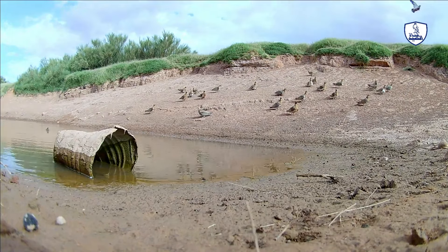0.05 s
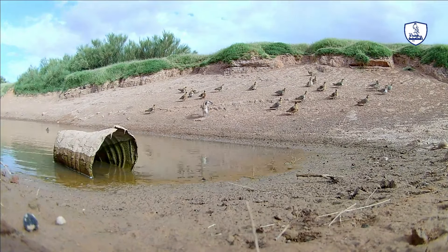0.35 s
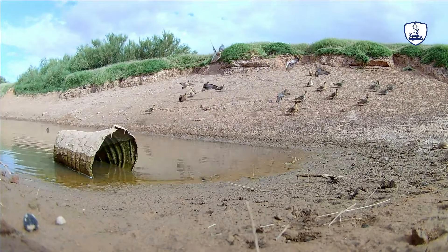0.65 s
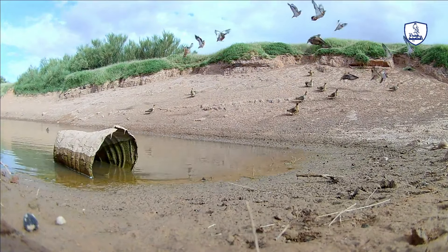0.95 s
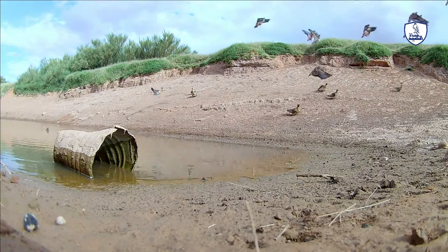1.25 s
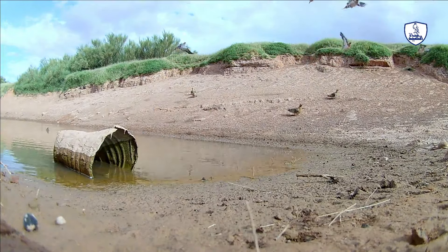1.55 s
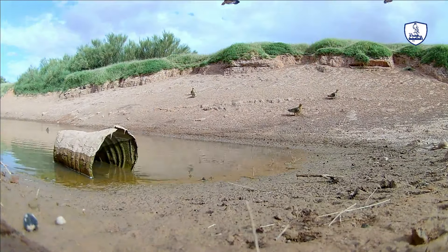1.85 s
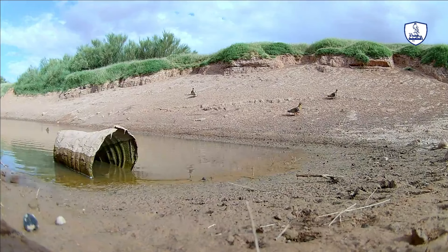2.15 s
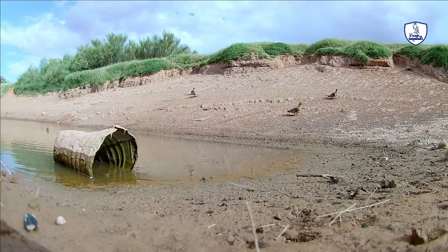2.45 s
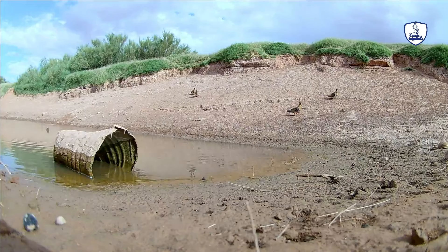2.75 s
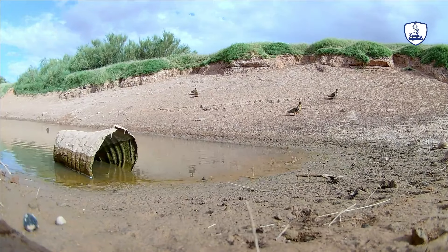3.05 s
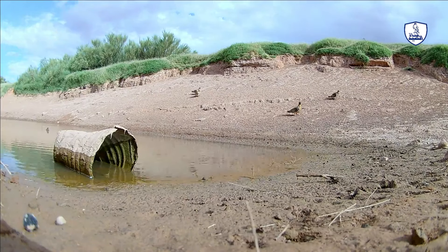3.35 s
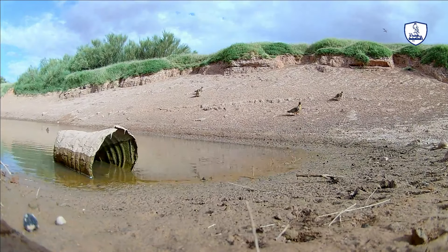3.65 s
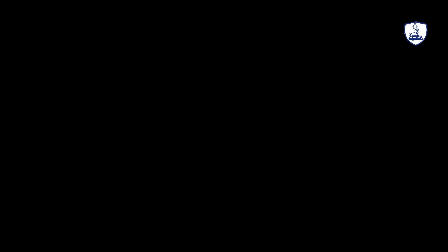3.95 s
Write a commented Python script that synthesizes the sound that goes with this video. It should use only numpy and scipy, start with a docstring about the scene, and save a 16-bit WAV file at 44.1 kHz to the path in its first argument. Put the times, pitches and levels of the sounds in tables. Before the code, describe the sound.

A flock of birds gives harsh clucks and nasal, quavering cries some way off, with a slight echo. From about 0.5 to 1.7 seconds the calls overlap thickly as the birds take off, wings fluttering and clicking. The flutter fades by 3 seconds while scattered calls continue. Wind rumbles on the microphone over faint hiss, strongest near 1.3 seconds. Everything cuts off at about 3.7 seconds.

```python
"""You hear harsh clucks and long nasal, quavering cries as a flock of sandgrouse takes off, some way off,
from the bank of a desert waterhole. Each call is a rasping tone shaped by the bird's throat and beak.
Wings flutter as they push puffs of air, and their tips click together. The bank adds a short echo.
Wind rumbles on the microphone over a faint hiss, and the sound cuts off shortly before the end."""
import sys
import numpy as np
from scipy import signal
from scipy.fft import rfft, irfft
from scipy.io import wavfile

SR = 44100
rng = np.random.default_rng(int(sys.argv[2]) if len(sys.argv) > 2 else 0)


def wav_record(signal):
    """Record a signal, one row per channel, as 16-bit PCM in the file named by sys.argv[1]."""
    frames = np.transpose(np.atleast_2d(signal))
    bounded = np.clip(frames, -1, 1)
    # unit amplitude maps onto the largest positive 16-bit level
    quanta = np.round(bounded * 32767).astype(np.int16)
    wavfile.write(sys.argv[1], SR, quanta)


N = 176400  # 4 seconds

# Short throaty clucks: start_s, length_s, first_hz, top_hz, last_hz, throat_db, nasal_db
CLUCKS = [ (.472, 0.091, 357, 446, 315, -32, -40), (.55, 0.088, 341.6, 421.3, 329.5, -35, -43),
          (.61, 0.079, 298.4, 432.3, 379, -35, -42), (.735, .068, 421, 539, 540, -27, -48),
          (.96, 0.11, 466.4, 606.5, 580, -36.5, -44.5), (1.14, 0.035, 442, 449.6, 402, -24.5, -41.5),
          (1.395, 0.089, 424, 499, 490.6, -30.5, -46.5), (1.465, 0.12, 514.6, 536, 341.5, -36.5, -55),
          (1.78, 0.06, 410, 408.5, 276, -36, -54), (1.865, 0.0485, 274, 412, 412.5, -36.5, -55),
          (2.845, 0.037, 250, 421, 422, -35, -65), (2.912, 0.063, 465, 463, 276.5, -34, -52.5),
          (3.018, 0.0433, 260, 424, 427, -36, -52), (3.06, 0.054, 402, 455, 281, -38, -43)]
# Long quavering cries: start_s, length_s, first_hz, top_hz, last_hz, throat_db, nasal_db
CRIES = [ (0, 0.14, 495, 518.4, 465, -42.5, -48.5), (.218, 0.11, 450, 501, 497, -46.5, -45.5),
         (1.595, 0.073, 601, 619, 543, -35, -34), (1.66, .22, 547.5, 545, 402.8, -40.5, -45),
         (1.69, 0.1, 439, 498.4, 495, -40.5, -40), (1.924, .11, 466, 499, 500.3, -40, -40.5),
         (1.988, .145, 421.6, 444.6, 365, -48, -45.5), (2.186, 0.31, 434.5, 453.5, 359, -47.5, -46),
         (2.25, 0.22, 603, 619, 471, -35, -44), (2.343, .21, 586.7, 591.2, 416, -45.5, -40),
         (2.525, 0.11, 415, 411, 325, -64.5, -50.5), (2.95, 0.13, 512, 559, 364, -49, -39.5),
         (3.108, .215, 570, 573, 427.5, -54.5, -42.5), (3.29, 0.13, 417.5, 418, 311, -67, -54.5),
         (3.67, 0.087, 632, 701, 748, -54, -50.5)]
# How each kind of call is sung; quaver is the pitch wobble as a share of the pitch
CLUCK_STYLE = dict(attack_s=0.013, release_s=0.0094, fade_db=-0.5, quaver=0.019, fall=1.6, rasp=0.26)
CRY_STYLE = dict(attack_s=0.0065, release_s=0.033, fade_db=-9.5, quaver=0.026, fall=1.7, rasp=0.18)
# The low, throaty resonance of the voice: frequency_hz, gain_db
THROAT_TONE = [(200, 4), (560, 0), (720, -13.5), (1050, -19.5), (2200, -57)]
# The higher, nasal resonance of the voice: frequency_hz, gain_db
NASAL_TONE = [(1050, -35.5), (1380, -3.5), (1740, -0.5), (2120, -9.5), (2550, -41), (5000, -49.5)]
# How loudly the rest of the flock calls: time_s, level_db
FLOCK_LEVELS = [(.55, -45.5), (.78, -38.5), (.88, -35), (1.2, -34.5), (1.45, -38), (1.72, -51.5)]
# How loud the wing flutter is: time_s, level_db
WING_LEVELS = [(0, -39), (.5, -40), (1.0, -31), (1.7, -32.5), (2.3, -38), (3.2, -52)]
# The soft, low tone of air pushed by wings: frequency_hz, gain_db
WING_TONE = [(50, 0.5), (130, 2), (330, 2), (700, -17), (2700, -36.5), (4300, -35.5), (9000, -69)]
# Wing tips meeting: start_s, gain_db
WING_CLAPS = [(0.7176, -45), (0.831, -39), (0.935, -41), (0.9615, -38), (1.1036, -41), (1.1973, -39),
              (1.4371, -36.5), (1.4822, -35.5), (1.5205, -35)]
# The bright tone of a wing-tip click: frequency_hz, gain_db
CLICK_TONE = [(2500, -12.5), (4300, 17), (6000, -5), (7200, 4), (9000, -6.5)]
# How the wind swells and sinks: time_s, level_db
WIND_LEVELS = [(0, -36), (.3, -29.5), (.55, -35), (.9, -30.5), (1.32, -25), (1.6, -30.5), (2.3, -35),
               (2.85, -40.5), (3.4, -46), (3.55, -41.5)]
# The deep tone of wind on the microphone: frequency_hz, gain_db
WIND_TONE = [(10, -7), (35, 3), (75, -0.5), (300, -22.5), (1500, -70.5)]
# The tone of the background hiss: frequency_hz, gain_db
HISS_TONE = [(200, 2), (900, -12), (3000, -24), (10000, -32.5), (15500, -28.5)]


def bird_call(length_s, first_hz, top_hz, last_hz, throat_db, nasal_db,
              attack_s, release_s, fade_db, quaver, fall, rasp):
    """A rasping tone and its overtones glide through the throat and nasal resonances."""
    quaver_hz, strain_above_hz, ring_hz = 32.02, 597, 2980
    t = np.arange(0, length_s, 1 / SR)
    progress, n = t / length_s, len(t)
    up, down = (abs(top_hz - first_hz) + 1) ** .6, (abs(top_hz - last_hz) + 1) ** .6
    top_at = up / (up + down)  # the wider glide takes the longer time
    hz = top_hz + (first_hz - top_hz) * np.maximum(1 - progress / top_at, 0) ** 1.572
    hz += (last_hz - top_hz) * np.maximum((progress - top_at) / (1 - top_at), 0) ** fall
    shake = np.sin(2 * np.pi * (quaver_hz * t + rng.random()) + wander(n, 21.2))
    hz *= 1 + quaver * shake + 0.01 * wander(n, 170)
    phase = 2 * np.pi * np.cumsum(hz) / SR
    # A call pushed to a high pitch rings a high overtone.
    strain = amp(throat_db - 26.5) / (1 + np.exp((strain_above_hz - top_hz) / 10))
    beak = 0.83 + 0.17 * np.minimum(progress / top_at, 1)  # the opening beak raises the nasal resonance
    voice = np.zeros(n)
    for k in range(1, 11):
        throat = amp(throat_db) * tone_gain(THROAT_TONE, k * hz)
        nasal = amp(nasal_db) * beak ** 2 * tone_gain(NASAL_TONE, k * hz / beak)
        ring = strain * np.exp(-(10 * np.log(k * hz / ring_hz)) ** 2 / 2)
        roughness = rasp * wander(n, 150) * np.cos(k * phase + 2 * np.pi * rng.random())
        voice += (throat + nasal + ring) * (np.cos(k * phase) + roughness)
    from_top = abs(progress - top_at)
    loudness = np.minimum(t / attack_s, 1) * np.minimum((length_s - t) / release_s, 1)
    loudness *= amp(fade_db * (from_top - from_top.mean()))  # quieter away from the top
    return np.sqrt(2) * voice * loudness * (1 + .2 * shake)  # the level shakes with the quaver


def leading_birds():
    """The clucks and cries that stand out from the flock."""
    out = np.zeros(N)
    for calls, style in ((CLUCKS, CLUCK_STYLE), (CRIES, CRY_STYLE)):
        for start_s, *call in calls:
            add(out, start_s, bird_call(*call, **style))
    return out


def flock(calls=42):
    """Many birds call over one another as they rise, each with its own glide and tone."""
    out = np.zeros(N)
    slots_s, gap_s = np.linspace(FLOCK_LEVELS[0][0], FLOCK_LEVELS[-1][0], calls, retstep=True)
    for slot_s in slots_s:
        start_s = slot_s + gap_s * rng.uniform(-0.46, .5)
        top_hz = rng.uniform(380, 560)
        first_hz, last_hz = top_hz * rng.uniform(0.65, 1, 2)
        throat_db = np.interp(start_s, *np.transpose(FLOCK_LEVELS))
        nasal_db = throat_db - 12 + 2 * rng.standard_normal()
        length_s = rng.uniform(0.0629, 0.15)
        add(out, start_s, bird_call(length_s, first_hz, top_hz, last_hz, throat_db, nasal_db, **CRY_STYLE))
    return out


def wing_flutter(birds=11, beats_per_s=12, stroke_s=0.024):
    """Each bird flaps at its own drifting rate; every downstroke pushes a puff of air."""
    power = np.zeros(N)
    for _ in range(birds):
        beats = np.cumsum(beats_per_s * (1 + 0.1099 * wander(N, 1))) / SR + rng.random()
        age = (beats % 1) / beats_per_s / stroke_s  # time since the flap began, in stroke lengths
        puffs = age * np.exp(-2 * age) * amp(6.75 * wander(N, 1.66))
        power += puffs ** 2
    air = np.sqrt(power) * rng.standard_normal(N)
    return normalise(shape_tone(air, WING_TONE)) * level_curve(WING_LEVELS)


def wing_claps(click_s=0.0022, thump_hz=235):
    """Wing tips meet: a dry click on a small thump of air."""
    out, t = np.zeros(N), np.arange(1024) / SR
    thump = np.sin(2 * np.pi * thump_hz * t) * np.exp(-t * thump_hz)
    for start_s, gain_db in WING_CLAPS:
        burst = rng.standard_normal(len(t)) * t * np.exp(-2 * t / click_s)
        click = shape_tone(burst, CLICK_TONE)
        add(out, start_s, amp(gain_db) * (amp(-7.5) * click / abs(click).max() + amp(14) * thump))
    return out


def bank_echo(sound, echo_db=-12.5, die_away_s=0.21):
    """The earth bank scatters back a short, weak echo, which is added to the sound."""
    t = np.arange(SR // 2) / SR
    tail = rng.standard_normal(len(t)) * amp(-60 * t / die_away_s) * np.minimum(t / 0.0031, 1)
    return sound + amp(echo_db) * signal.fftconvolve(sound, tail / np.linalg.norm(tail))[:N]


def wind(gust_db=1.5):
    """Wind buffets the microphone with a low, lumpy rumble."""
    gusts = rng.standard_normal(N) * amp(gust_db * wander(N, 18))
    return normalise(shape_tone(gusts, WIND_TONE)) * level_curve(WIND_LEVELS)


def hiss(level_db=-51):
    """The air and the microphone give a faint, steady hiss."""
    return amp(level_db) * normalise(shape_tone(rng.standard_normal(N), HISS_TONE))


def amp(db):
    """Turns decibels into a number to multiply by."""
    return 10 ** (np.asarray(db) / 20)


def normalise(sound):
    """Scales a sound so its average (rms) level is 1."""
    return sound / np.sqrt(np.mean(sound ** 2) + 1e-20)


def tone_gain(tone, hz):
    """Looks up a tone table's gain at these frequencies."""
    table_hz, db = np.transpose(tone)
    return amp(np.interp(np.log(hz + 1), np.log(table_hz), db))


def level_curve(levels):
    """Turns a level table into a gain for every sample."""
    return amp(np.interp(np.arange(N) / SR, *np.transpose(levels)))


def shape_tone(sound, tone):
    """Turns each frequency up or down as a tone table says."""
    hz = np.fft.rfftfreq(len(sound), 1 / SR)
    return irfft(rfft(sound) * tone_gain(tone, hz), len(sound))


def wander(samples, rate_hz):
    """A smooth random wobble, mostly slower than rate_hz."""
    span = max(samples, 16384)
    hz = np.fft.rfftfreq(span, 1 / SR)
    spectrum = rfft(rng.standard_normal(span)) / (1 + (hz / rate_hz) ** 4)
    return normalise(irfft(spectrum, span))[:samples]


def add(mix, start_s, sound):
    """Mixes a sound in at its start time."""
    part = mix[max(0, round(start_s * SR)):][:len(sound)]
    part += sound[:len(part)]


def scene():
    """Calls and claps echo off the bank; flutter, wind and hiss join them in one channel."""
    birds = bank_echo(leading_birds() + flock() + wing_claps())
    return (birds + wing_flutter() + wind() + hiss())[None]


def record(dry, stop_s=3.742, treble_limit_hz=15800):
    """Fades in quickly, cuts off near the end and removes the very highest treble."""
    t = np.arange(N) / SR
    ramp = np.clip(np.minimum(t, stop_s + .003 - t) / .006, 0, 1)
    fade = np.sin(np.pi / 2 * ramp) ** 2
    low_pass = signal.firwin(1023, treble_limit_hz, window=("kaiser", 9), fs=SR)
    return signal.oaconvolve(dry * fade, low_pass[None], "same")


dry = scene()
out = record(dry)
wav_record(out)
```